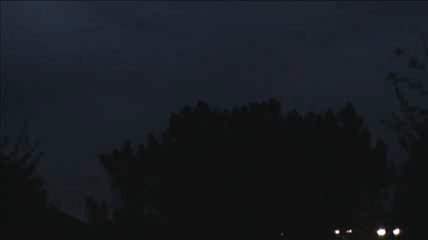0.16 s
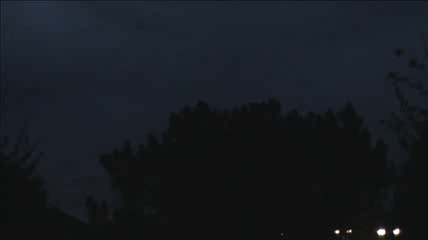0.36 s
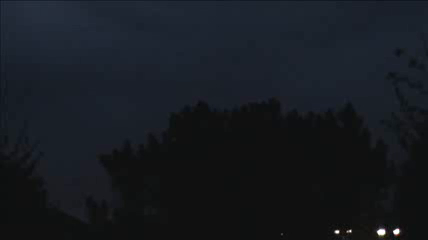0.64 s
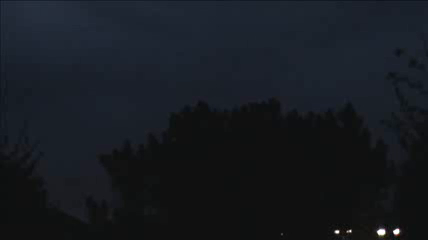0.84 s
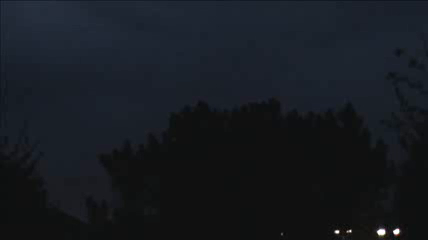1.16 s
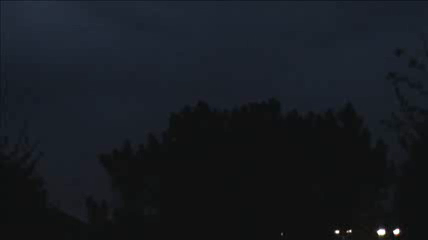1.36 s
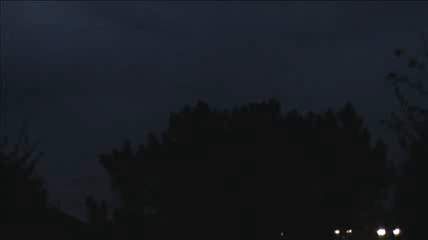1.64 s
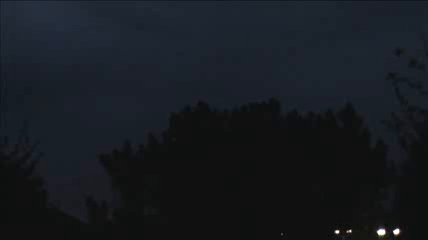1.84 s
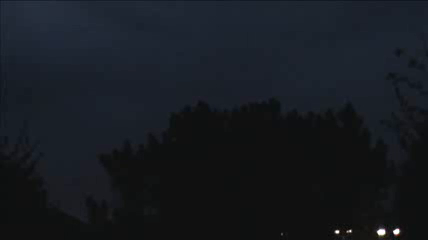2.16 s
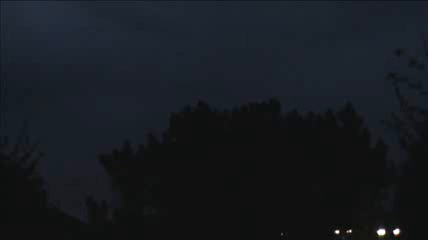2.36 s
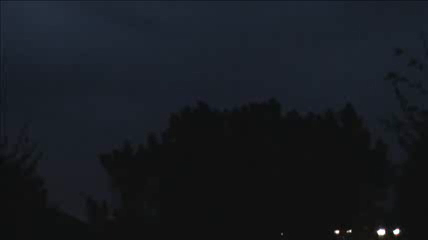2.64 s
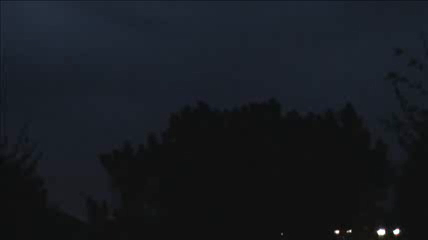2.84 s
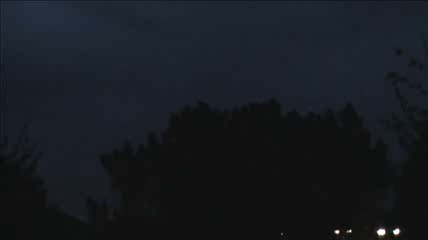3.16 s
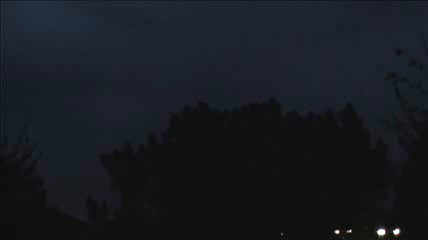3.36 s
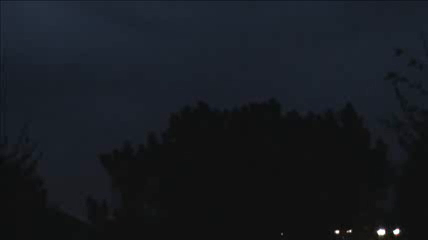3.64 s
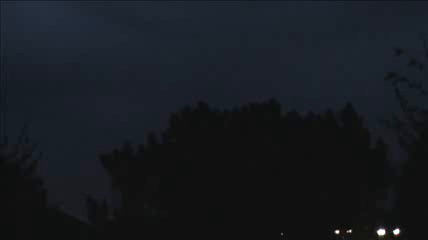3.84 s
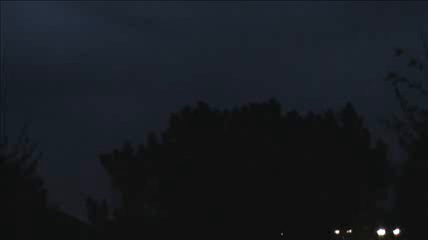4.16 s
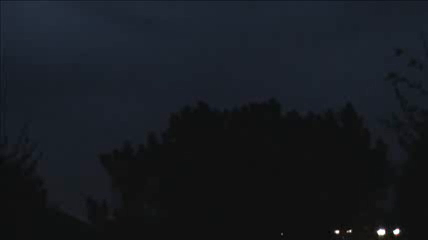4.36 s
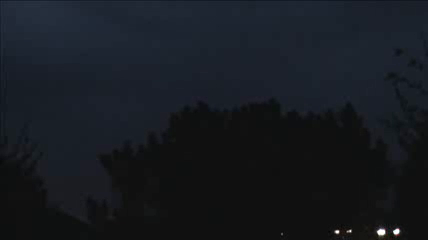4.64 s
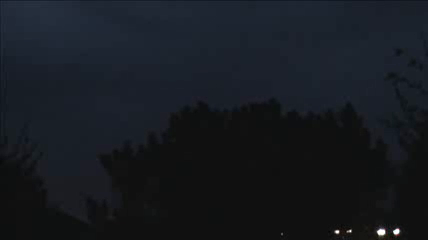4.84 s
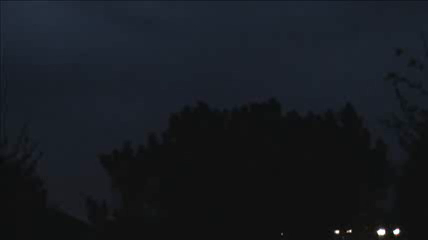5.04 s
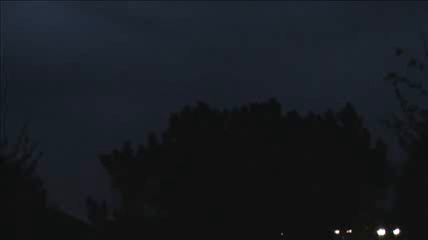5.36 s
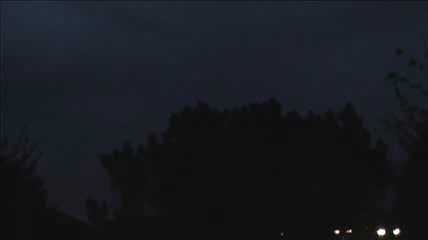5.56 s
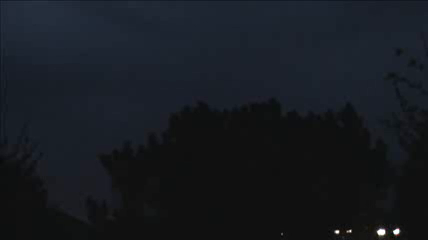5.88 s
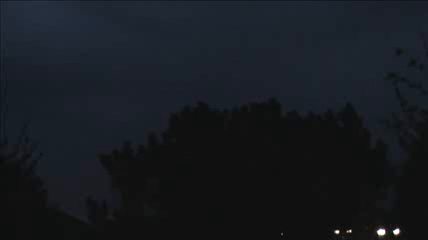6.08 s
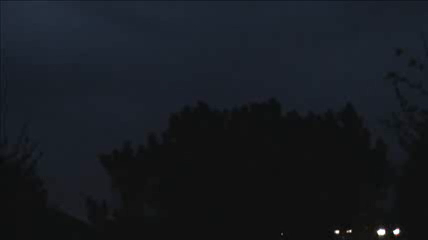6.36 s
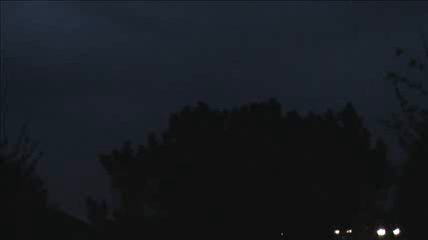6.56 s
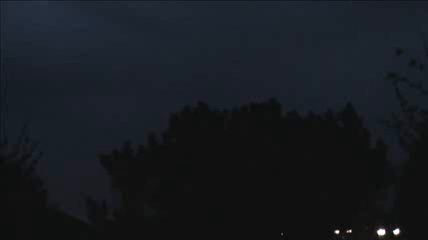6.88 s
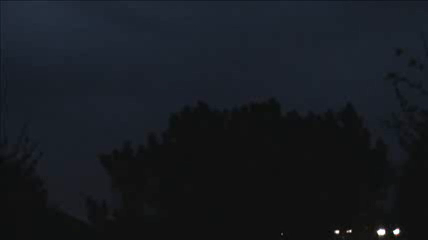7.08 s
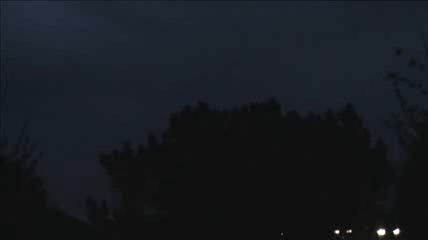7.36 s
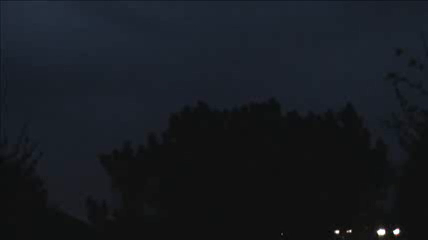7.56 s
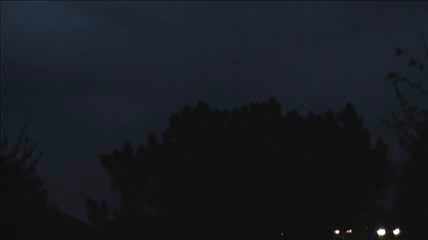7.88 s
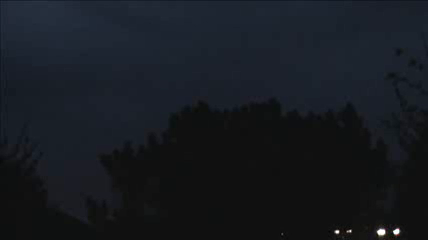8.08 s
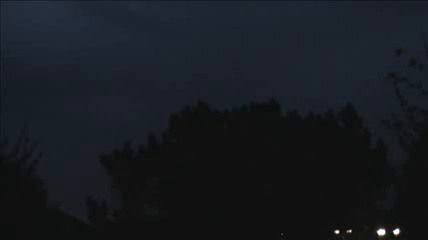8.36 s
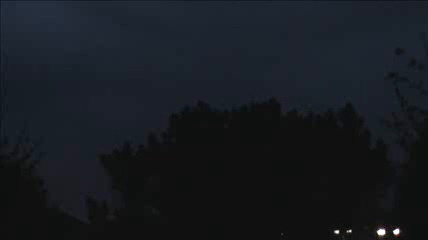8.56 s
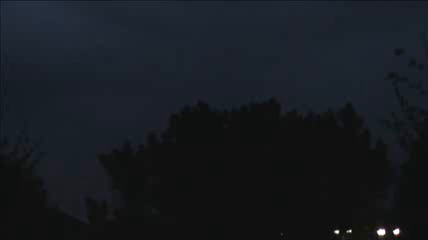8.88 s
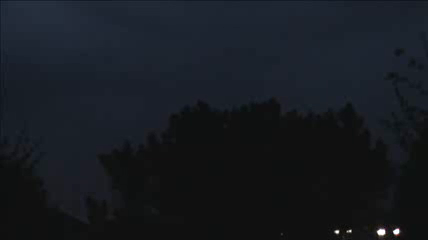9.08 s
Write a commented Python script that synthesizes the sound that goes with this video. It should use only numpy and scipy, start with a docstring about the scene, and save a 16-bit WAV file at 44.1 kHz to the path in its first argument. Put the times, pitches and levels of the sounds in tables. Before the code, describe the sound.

Quiet gardens before dawn. Distant blackbirds whistle faintly, softened by echoes, over low town hum and light microphone hiss. Around two seconds a nearer blackbird, slightly left, sings rich fluty notes that finish in a thin, rasping high twitter. It rests while the far birds continue, then sings a second, rounder phrase from about seven and a half seconds to the end. Stereo outdoor pickup with a short leafy echo.

```python
"""Blackbirds call softly from far gardens over a faint town hum, before dawn; then one sings two phrases
from a tree to the left. It whistles with both halves of its syrinx, and pinched airflow adds overtones.
Far songs are gliding whistles blurred by echoes; hum and hiss are a wavering sine and shaped noise.
The recorder's nearest-sample rate change mirrors every note around multiples of a fixed clock."""
import sys
import numpy as np
from scipy import signal
from scipy.fft import rfft, irfft, next_fast_len
from scipy.io import wavfile
from scipy.ndimage import uniform_filter1d, map_coordinates

SR = 44100
rng = np.random.default_rng(int(sys.argv[2]) if len(sys.argv) > 2 else 0)


def int16_out(signal):
    """Quantize to a 16-bit WAV file."""
    q = np.round(np.clip(np.atleast_2d(signal).T, -1, 1) * 32767)
    wavfile.write(sys.argv[1], SR, q.astype(np.int16))


N = 406161  # length in samples


def amp(db):
    """Turn decibels into gain."""
    return 10 ** (np.asarray(db) / 20)


def unit(x):
    """Scale a sound to rms 1."""
    return x / np.sqrt(np.mean(x ** 2) + 1e-20)


def along(points, hz):
    """Read a curve of (Hz, value) points on a log frequency axis."""
    point_hz, value = np.transpose(points)
    return np.interp(np.log(hz + 1), np.log(point_hz + 1), value)


def wobble(rate):
    """Draw a smooth random curve with rate knots a second."""
    knots = rng.standard_normal(int(N * rate / SR) + 4)
    return map_coordinates(knots, [np.arange(N) * rate / SR])


def filtered(x, response):
    """Filter a sound by a complex response, given as a function of frequency in Hz."""
    size = next_fast_len(N + SR // 2)
    spectrum = rfft(x, size) * response(np.fft.rfftfreq(size, 1 / SR))
    return irfft(spectrum, size)[..., :N]


def whistle(hz):
    """Sound a sine of rms 1 that follows the pitch, by summing its phase."""
    return np.sqrt(2) * np.sin(2 * np.pi * np.cumsum(hz) / SR)


def phrase(notes, attack_s, release_s, arch=2.4):
    """Glide pitch and level from first to turn to last; return them, further columns and the breath gate."""
    t, notes = np.arange(N) / SR, np.transpose(notes)
    # each moment belongs to the nearest note
    borders = (notes[2, :-1] + notes[0, 1:]) / 2
    rows = notes[:, np.searchsorted(borders, t)]
    start, turn, end = rows[:3]
    before = np.clip((turn - t) / np.maximum(turn - start, 1e-3), 0, 1)
    after = np.clip((t - turn) / np.maximum(end - turn, 1e-3), 0, 1)

    def glide(first, middle, last, bend):
        return middle + (first - middle) * before ** bend + (last - middle) * after ** bend

    # arched notes turn at their highest or lowest pitch and are rounded there
    arched = (rows[3] - rows[4]) * (rows[5] - rows[4]) > 0
    pitch_hz = glide(*rows[3:6], np.where(arched, arch, 1))
    level_db = glide(*rows[6:9], 1)
    # the breath opens just before the start and closes just after the end
    gate = np.clip(1 + np.minimum((t - start) / attack_s, (end - t) / release_s), 0, 1)
    controls = [uniform_filter1d(c, size=177) for c in (pitch_hz, level_db, *rows[9:])]
    return controls + [np.sin(np.pi / 2 * gate) ** 2]


# Lower voice of the near syrinx, levels before the path to the listener:
# start_s, turn_s, end_s, first_hz, turn_hz, last_hz, first_db, turn_db, last_db, overtones_db (relative)
LOWER_VOICE = [ (1.832, 1.86, 1.875, 1250, 1980, 2080, -56, -43, -37, -24),
               (1.875, 1.93, 2.005, 2120, 2125, 1990, -38, -40, -49, -21),
               (2.048, 2.135, 2.21, 2125, 2070, 1975, -35, -35, -55, -20),
               (2.282, 2.314, 2.345, 1460, 1800, 2620, -52, -43, -39, -25),
               (2.345, 2.44, 2.48, 2585, 2695, 2680, -37, -37, -50, -34),
               (2.715, 2.8, 2.83, 1935, 1865, 1985, -41, -36, -43, -28),
               (2.83, 2.868, 3.012, 1975, 2220, 2270, -38, -34, -31, -21),
               (3.108, 3.125, 3.15, 1990, 2088, 2055, -44, -39, -38, -21),
               (3.15, 3.256, 3.305, 2055, 1848, 1650, -38, -40, -46, -19),
               (3.482, 3.524, 3.541, 2332, 2954, 3050, -43, -37, -45, -18),
               (3.541, 3.553, 3.585, 3040, 3220, 3760, -26, -30, -35, -26),
               (3.585, 3.602, 3.618, 3760, 3880, 3420, -35, -38, -41, -26),
               (3.826, 3.9, 3.994, 2620, 3010, 3130, -50, -43, -41, -34),
               (4.052, 4.13, 4.265, 4940, 5050, 4830, -42, -45, -55, -23),
               (4.35, 4.355, 4.361, 3570, 3620, 3680, -50, -46, -45, -28),
               (4.361, 4.367, 4.379, 3680, 4480, 3650, -48, -49, -46, -28),
               (4.415, 4.419, 4.424, 3560, 3650, 3720, -46, -46, -46, -26),
               (4.424, 4.43, 4.441, 3720, 4450, 3800, -47, -48, -54, -26),
               (7.47, 7.495, 7.535, 2025, 1930, 1950, -51, -46, -48, -37),
               (7.535, 7.64, 7.705, 1925, 1920, 1905, -46, -42.5, -42, -29),
               (7.797, 7.82, 7.85, 1620, 1652, 1627, -54, -47.5, -57, -19),
               (7.866, 7.893, 7.938, 1960, 2210, 2080, -44, -33, -34, -20),
               (7.938, 7.99, 8.025, 2155, 2145, 2115, -39, -39.5, -46, -17),
               (8.156, 8.2, 8.345, 1800, 2235, 1800, -38, -32, -40, -26),
               (8.455, 8.483, 8.535, 2860, 2920, 2810, -46, -35, -23, -37),
               (8.535, 8.565, 8.59, 2810, 2730, 2600, -23, -33, -33, -29),
               (8.66, 8.68, 8.785, 1825, 1850, 1842, -38, -32, -38, -28),
               (8.958, 9.005, 9.158, 2050, 2325, 1850, -43, -28, -40, -27), ]
# Upper voice: start_s, turn_s, end_s, first_hz, turn_hz, last_hz, first_db, turn_db, last_db
UPPER_VOICE = [ (2.281, 2.3, 2.322, 2395, 2370, 2330, -49, -54, -57),
               (2.702, 2.742, 2.8, 2080, 2790, 2520, -50, -55, -62),
               (3.098, 3.13, 3.15, 2250, 2940, 2900, -41, -46, -51),
               (3.15, 3.29, 3.325, 2900, 2540, 2250, -50, -42, -37),
               (3.436, 3.464, 3.475, 3270, 3782, 4400, -36, -31, -35),
               (3.756, 3.768, 3.788, 7600, 8000, 8195, -63, -60, -52),
               (3.788, 3.795, 3.802, 8300, 8850, 5900, -46, -40, -36),
               (3.802, 3.815, 3.83, 5860, 6390, 6950, -44, -41, -41),
               (3.83, 3.87, 4.0, 6920, 6690, 6550, -48, -51, -58),
               (4.05, 4.14, 4.268, 7790, 7980, 7960, -56, -55, -60),
               (4.334, 4.343, 4.358, 2200, 5300, 5750, -48, -51, -54),
               (4.397, 4.404, 4.422, 2300, 5500, 5800, -50, -46, -53),
               (7.475, 7.5, 7.557, 3200, 3140, 2975, -66, -60, -63),
               (7.793, 7.819, 7.858, 2820, 2890, 2717, -55, -52, -51),
               (8.148, 8.245, 8.352, 2100, 3150, 2260, -46, -55, -50),
               (8.447, 8.46, 8.488, 3020, 3390, 3328, -40, -36, -48),
               (8.656, 8.68, 8.79, 2260, 2355, 2300, -38, -47, -62),
               (8.94, 9.035, 9.176, 1950, 3170, 2200, -48, -57, -47), ]
# Overtone colour of the windpipe: frequency_hz, gain_db
THROAT_COLOUR = [(2500, -29), (3300, -13), (4000, -21), (5500, -20), (7000, -13.5), (8300, 6), (9500, -1),
                 (12000, -6), (15000, -12)]


def blackbird():
    """Blow two whistles in one windpipe; their pinched airflow makes overtones and sum tones."""
    low_hz, low_db, over_db, low_gate = phrase(LOWER_VOICE, attack_s=.008, release_s=.008)
    high_hz, high_db, high_gate = phrase(UPPER_VOICE, attack_s=.008, release_s=.008)
    low_swing, high_swing, throb = tremble()
    low = low_gate * whistle(low_hz + low_swing + 12 * wobble(150))
    high = high_gate * whistle(high_hz + high_swing + 30 * wobble(150))
    low_size = amp(low_db + 1.28 * wobble(45))
    high_size = amp(high_db + 3.7 * wobble(60))
    breath = low_size * low_gate + high_size * high_gate
    # each side pinches the shared flow into narrow pulses
    pulses = amp(over_db - 8.5) * np.exp(2.666 * low + 0.87 * high)
    overtones = filtered(breath * pulses, lambda hz: amp(along(THROAT_COLOUR, hz)) * (hz > 1000))
    # turbulence at the beak
    hiss_colour = [(1500, -34), (4000, -25), (8500, -25), (15000, -23)]  # frequency_hz, gain_db
    hiss = filtered(breath * rng.standard_normal(N), lambda hz: amp(along(hiss_colour, hz)))
    return (low_size * low + high_size * high + overtones) * (1 + throb) + hiss


# Trembling stretches, depths before their uneven strength:
# start_s, end_s, rate_hz, lower_swing_hz, upper_swing_hz, throb (0-1), rasp (0-1)
TREMBLING = [(1.85, 2.0, 62.6, 54, -5, 0.55, 0.074), (2.84, 3.03, 71, 156, 0, .35, 0.046),
             (3.43, 3.481, 108.9, -7, 0, 0.68, .05), (3.476, 3.53, 190.7, 220, -3, 0.26, .8),
             (3.54, 3.63, 105.2, 8, 0, 0.7, .15), (3.79, 3.83, 185.9, 204, 252, .2, .3),
             (3.82, 4.0, 185.1, 270, 60, 0.31, .4), (4.05, 4.28, 178, 110, 190, 0.33, .22),
             (4.325, 4.454, 181.2, 46, 40, .2, .15), (7.465, 7.535, 44.72, 260, -7, .3, .25),
             (7.78, 7.867, 90.7, 25, 38, 0.26, 0.22), (7.935, 8.03, 52.07, 240, 0, 0.3, 0.16),
             (8.44, 8.49, 90.1, 35, 34, 0.39, .25)]


def tremble():
    """Make notes tremble a little unevenly: pitch swing of each voice, and throb and rasp of loudness."""
    t, trembles = np.arange(N) / SR, np.zeros((3, N))
    uneven, strength = .5 * wobble(60), 1 + 0.2477 * wobble(90)
    flutter = np.clip(wobble(1300), -2, 2)
    for start, end, rate, low_swing, high_swing, throb, rasp in TREMBLING:
        on = np.clip(np.minimum(t - start, end - t) / 0.00804, 0, 1) * strength
        turn = 2 * np.pi * rate * (t - start) + uneven * rate / 180
        swing = np.sin(turn)
        loudness = throb * np.sin(turn + 1.3) + rasp * flutter
        trembles += on * np.array([low_swing * swing, high_swing * swing, loudness])
    return trembles


# Stereo place of the near bird: frequency_hz, left_minus_right_db
NEAR_PAN = [(2500, 3.5), (5000, 1.3), (10000, .7)]


def nearby(x):
    """Carry the song from the left: direct path, ground bounce, scatter off near branches and garden tail."""
    side = lambda hz: amp(along(NEAR_PAN, hz) * [[.5], [-.5]])
    bounce = lambda hz: 1 + amp(-12) * np.exp(-2j * np.pi * hz * .0046)  # arrives 4.6 ms late
    branches = echoes(x, stretch=0.24)
    branches = 0.91 * branches[0] + 0.72 * branches  # near scatter is much alike left and right
    wet = amp(-10) * branches + amp(-11) * echoes(x, stretch=0.81)
    direct = filtered(amp(-1.97) * x, lambda hz: side(hz) * bounce(hz))
    return direct + filtered(wet, side)


# Echo decay of the garden, before each use stretches it: frequency_hz, t60_s
GARDEN_DECAY = [(1000, 0.84), (3000, 0.47), (8000, 0.67)]


def echoes(x, stretch):
    """Answer from trees and houses: a diffuse tail of decaying noise, different left and right."""
    hz, t, grains = signal.stft(rng.standard_normal((2, SR)), SR, nperseg=256)
    t60_s = stretch * along(GARDEN_DECAY, hz)[:, None]
    tail = signal.istft(grains * amp(-60 * t / t60_s), SR, nperseg=256)[1]
    tail = tail / np.linalg.norm(tail[0])
    return signal.fftconvolve(np.atleast_2d(x), tail, axes=1)[:, :N]


# Far blackbirds, one list a bird (a lower and a higher song), levels before pan and flicker:
# start_s, end_s, first_hz, middle_hz, last_hz, level_db
FAR_SONGS = [
    [(.05, .11, 2150, 2000, 2100, -67), (.13, .25, 2160, 2165, 2120, -65),
     (.27, .35, 2000, 1985, 1990, -59), (.37, .49, 2040, 2055, 2060, -64),
     (.51, .59, 2290, 2470, 2480, -63), (.59, .7, 2480, 2330, 2170, -62), (.73, .89, 2165, 2150, 2120, -65),
     (1.06, 1.14, 2080, 2280, 2150, -69), (1.15, 1.21, 2080, 1990, 1945, -64),
     (1.28, 1.34, 1500, 1600, 1650, -74), (1.37, 1.45, 1710, 1720, 1730, -68),
     (1.51, 1.585, 2125, 2120, 2115, -71), (1.7, 1.775, 1850, 1810, 1800, -65),
     (3.965, 4.055, 2245, 2195, 1970, -61), (4.39, 4.54, 2050, 2170, 2330, -64),
     (4.56, 4.62, 2365, 2385, 2340, -59), (4.62, 4.69, 2300, 2170, 2040, -64),
     (4.7, 4.77, 2010, 1970, 1950, -65), (5.23, 5.32, 2210, 2170, 2175, -65),
     (5.38, 5.52, 2100, 2400, 2315, -63), (5.565, 5.655, 2290, 2300, 2340, -67),
     (5.91, 6.02, 2000, 2100, 2110, -69), (6.54, 6.6, 2060, 2080, 2118, -72),
     (6.745, 6.97, 2142, 2420, 2280, -73), (7.015, 7.08, 1810, 1830, 1830, -68),
     (7.1, 7.125, 2110, 2100, 2150, -60), (7.155, 7.18, 2200, 2215, 2225, -61),
     (7.315, 7.34, 2285, 2270, 2230, -56), (7.37, 7.44, 2160, 2070, 1980, -68)],
    [(.02, .11, 2590, 2580, 2627, -72), (.23, .28, 2450, 2320, 2350, -71),
     (.335, .41, 2200, 2340, 2500, -69), (.43, .49, 2610, 2670, 2730, -69),
     (1.335, 1.41, 2250, 2070, 1930, -69), (1.63, 1.7, 2400, 2300, 1950, -72),
     (1.77, 1.82, 2030, 2110, 2080, -64), (2.57, 2.69, 2010, 2170, 2277, -71),
     (4.51, 4.56, 3050, 3140, 3200, -71), (4.58, 4.71, 2700, 2720, 2680, -70),
     (4.815, 4.86, 2780, 2740, 2735, -70), (4.905, 4.94, 2840, 3020, 3200, -71),
     (4.98, 5.04, 2750, 2700, 2620, -71), (5.37, 5.5, 1850, 1820, 1800, -74),
     (6.11, 6.165, 3040, 3050, 2750, -76), (6.195, 6.225, 3170, 3190, 3180, -73),
     (6.29, 6.32, 3180, 3150, 3050, -76), (6.79, 6.92, 2530, 2645, 2680, -74),
     (7.0, 7.16, 2730, 2720, 2520, -77), (7.345, 7.42, 2470, 2590, 2500, -68),
     (8.39, 8.435, 2650, 2730, 2815, -63), (8.71, 8.775, 2930, 3070, 2990, -59)],
]


def far_singer(notes, pan_db):
    """Sing one distant song, half lost in echoes; its soft-edged notes turn halfway and hold one base level."""
    rows = [(start, (start + end) / 2, end, *pitch, db, db, db) for start, end, *pitch, db in notes]
    hz, db, gate = phrase(rows, attack_s=.016, release_s=.016)
    song = amp(db + 4.5 * wobble(30)) * gate * whistle(hz + 25 * wobble(60))
    return amp([[pan_db], [-pan_db]]) * song + amp(-5) * echoes(song, stretch=1.05)


# Loudness of the farthest birds together: time_s, level_db
CHORUS_LEVEL = [(0, -58.5), (.4, -62), (0.899, -69), (1.5, -70.5), (2.5, -61.5), (3.5, -66.5), (4.4, -65),
                (5, -66), (5.6, -64), (6.2, -82), (6.7, -81), (7.2, -65.5), (7.7, -62.5), (8.5, -56),
                (9.21, -58.5)]


def chorus(count=24):
    """Blur many still farther birds together, each whistling short warbled notes at random."""
    s, db = np.transpose(CHORUS_LEVEL)
    voices = np.zeros(N)
    for _ in range(count):
        notes = np.clip(wobble(16) - .6, 0, 1)  # only the peaks sound
        voices += notes * whistle(2200 * np.exp(.12 * wobble(5) + .05 * wobble(22)))
    blur = echoes(voices, stretch=2.5) + amp(-4) * voices
    return amp(np.interp(np.arange(N) / SR, s, db)) * unit(blur)


# Loudness of the low hum, before its random waver: time_s, level_db
HUM_LEVEL = [(0.0, -83), (1.15, -79), (3.18, -81.5), (3.5, -72), (3.85, -81), (4.74, -80), (5.3, -88),
             (8.2, -84), (8.64, -79), (9.21, -81)]


def hum():
    """Hold a low sine near 125 Hz that wavers and comes and goes."""
    s, db = np.transpose(HUM_LEVEL)
    level_db = np.interp(np.arange(N) / SR, s, db) + 3.5 * wobble(9)
    return amp(level_db) * whistle(125 + 3.41 * wobble(4.6))


# Colour of town hum and microphone hiss: frequency_hz, relative_level_db (per Hz)
AIR_COLOUR = [(12, -26), (20, -7.5), (70, 3), (103, -6), (372, -6), (505, -4), (834, -7), (1410, -10),
              (2030, -6.5), (3640, -13.5), (9930, -17.5), (14300, -15), (15500, -17.5)]
# Left-right likeness of that noise: frequency_hz, correlation (-1 to 1)
AIR_LIKENESS = [(60, 0.99), (150, 0.91), (380, 0.28), (950, -0.44), (2380, 0.36), (5980, 0.56), (15000, 1)]


def air(level_db=-63):
    """Spread steady noise over mid and side, so left and right are alike in the bass."""
    turn = lambda hz: np.arccos(np.clip(along(AIR_LIKENESS, hz), -1, 1)) / 2
    spread = lambda hz: np.array([np.cos(turn(hz)), np.sin(turn(hz))])
    noise = rng.standard_normal((2, N))
    mid, side = filtered(noise, lambda hz: amp(along(AIR_COLOUR, hz)) * spread(hz))
    return amp(level_db) * unit(np.array([mid + side, mid - side]))


def scene():
    """Mix the near bird, far birds, hum and air."""
    far = far_singer(FAR_SONGS[0], pan_db=-.8) + far_singer(FAR_SONGS[1], pan_db=-.3) + chorus()
    return nearby(blackbird()) + far + hum() + air()


def record(dry, clock_hz=3906, top_hz=15500):
    """Shift timing by a saw of about half a sample, as nearest-sample rate change does; then soften the treble."""
    slip_s = 1.075 * ((np.arange(N) * clock_hz / SR) % 1 - .5) / SR
    slope = filtered(dry, lambda hz: 2j * np.pi * hz)
    shifted = dry + slip_s * slope  # a small time shift follows the slope of the wave
    return filtered(shifted, lambda hz: (hz < top_hz) / np.sqrt(1 + (hz / 14000) ** 4))


dry = scene()
out = record(dry)
int16_out(out)
```